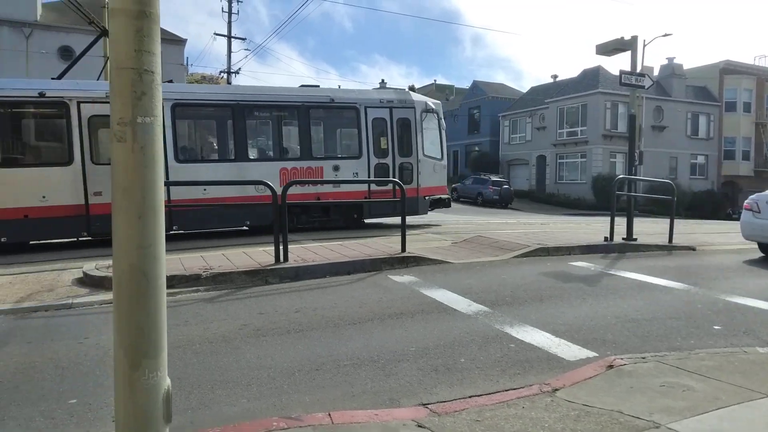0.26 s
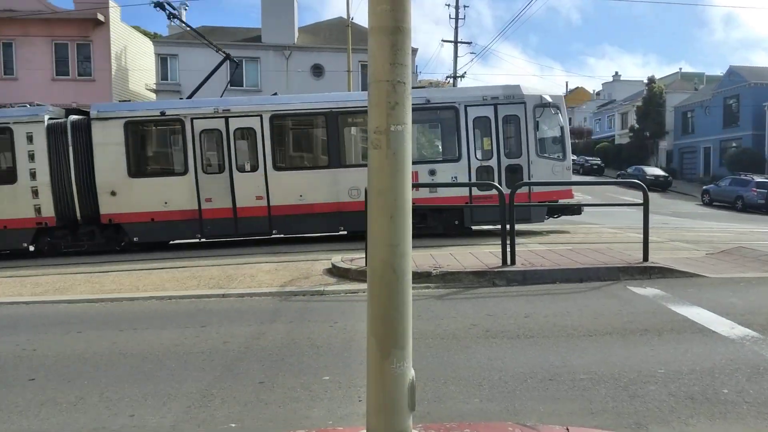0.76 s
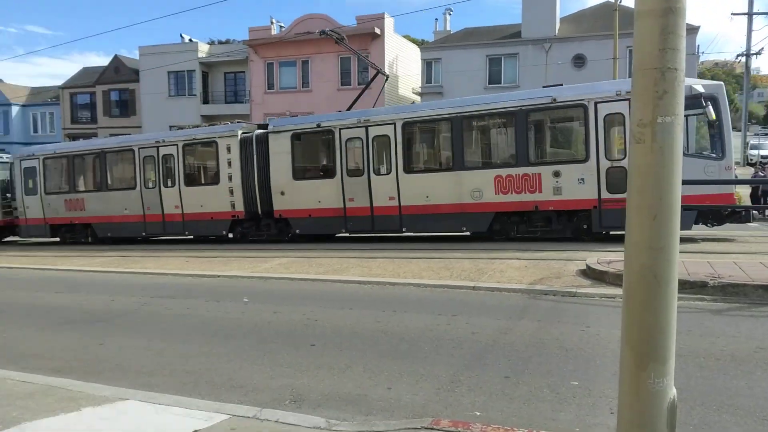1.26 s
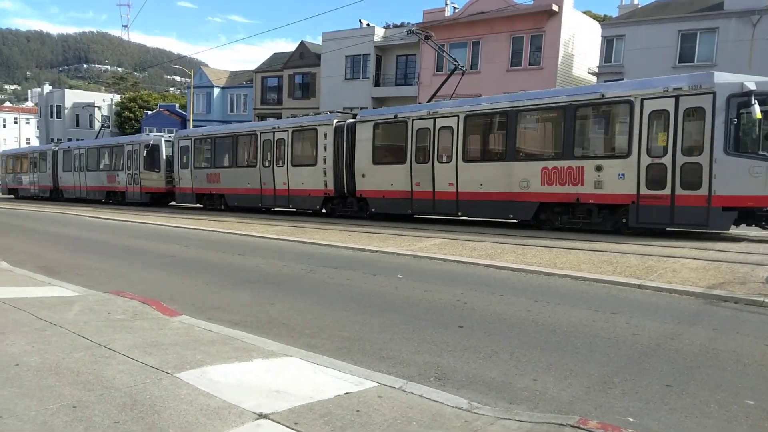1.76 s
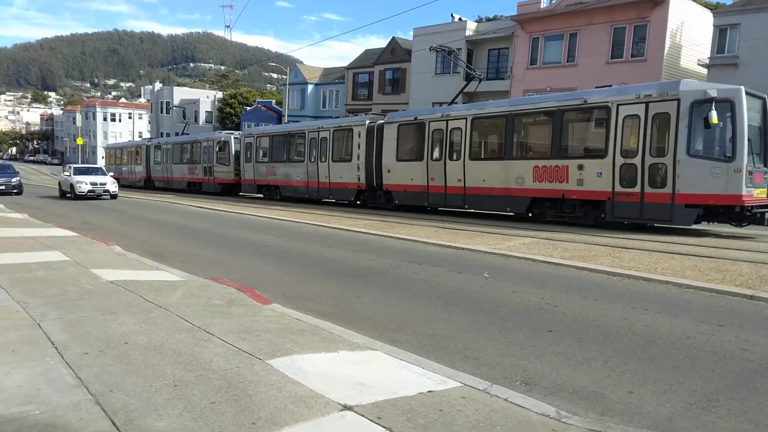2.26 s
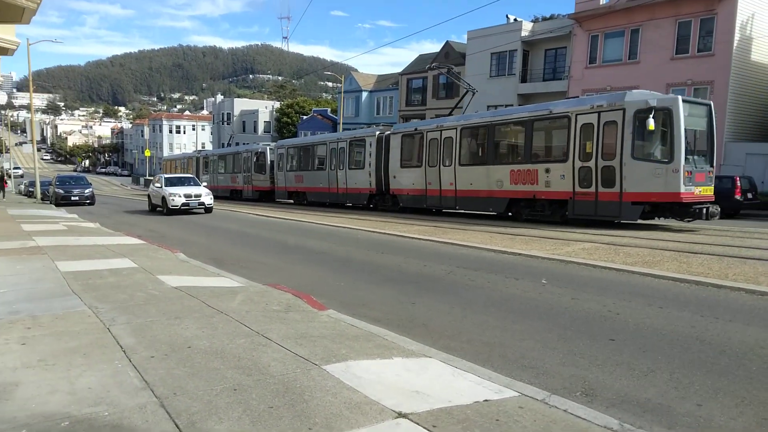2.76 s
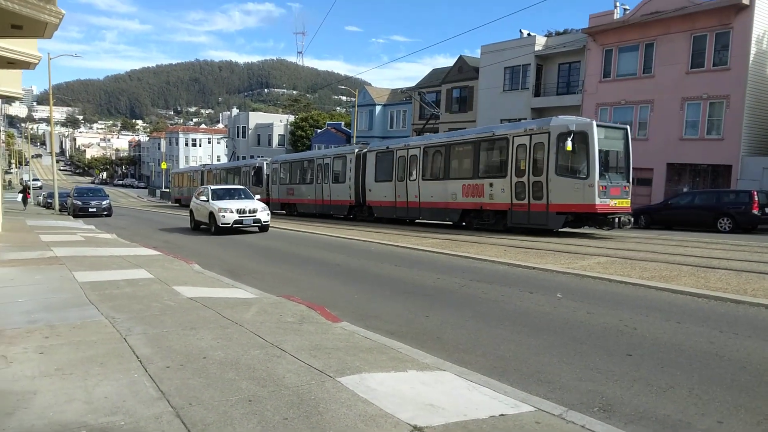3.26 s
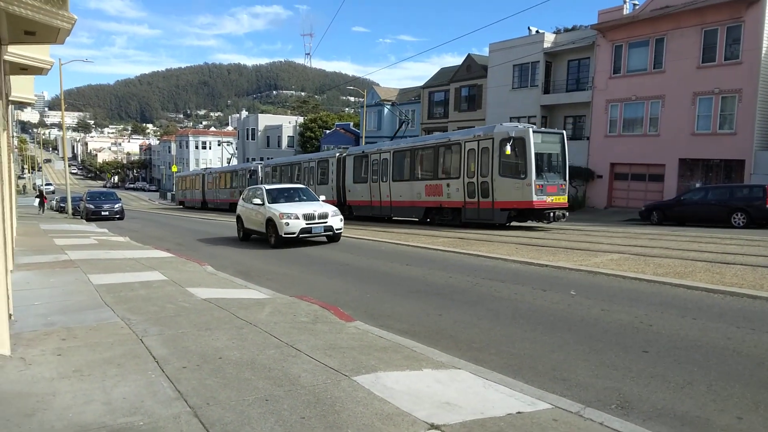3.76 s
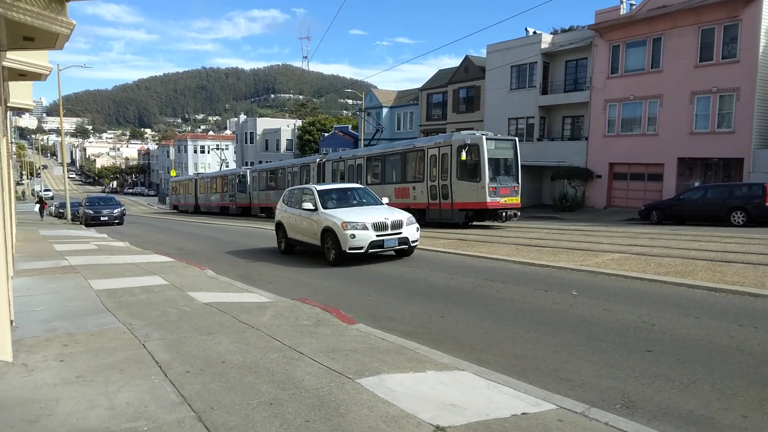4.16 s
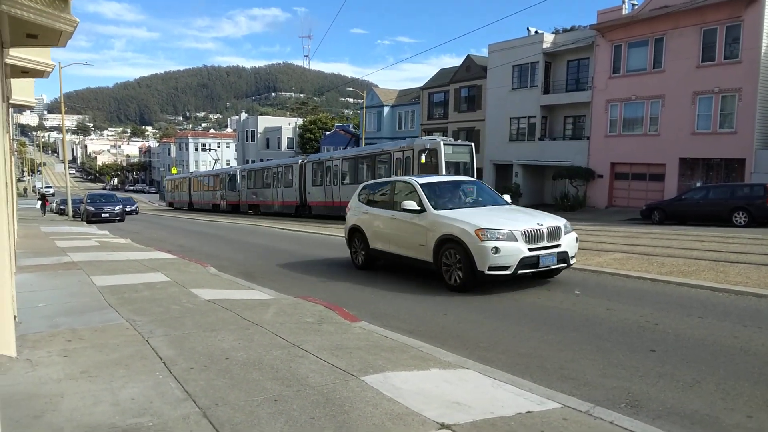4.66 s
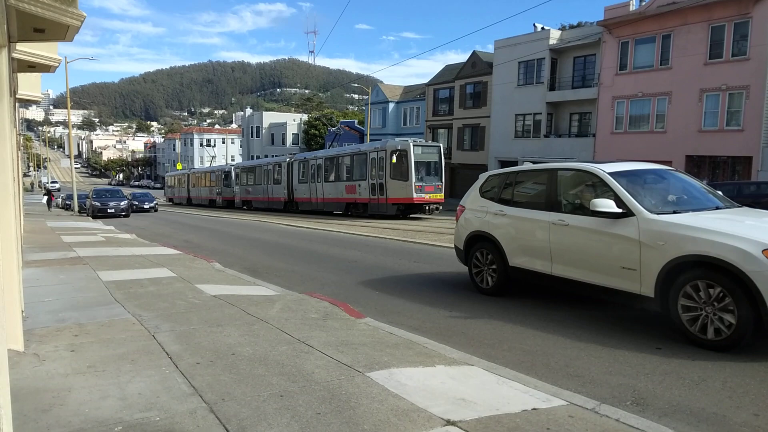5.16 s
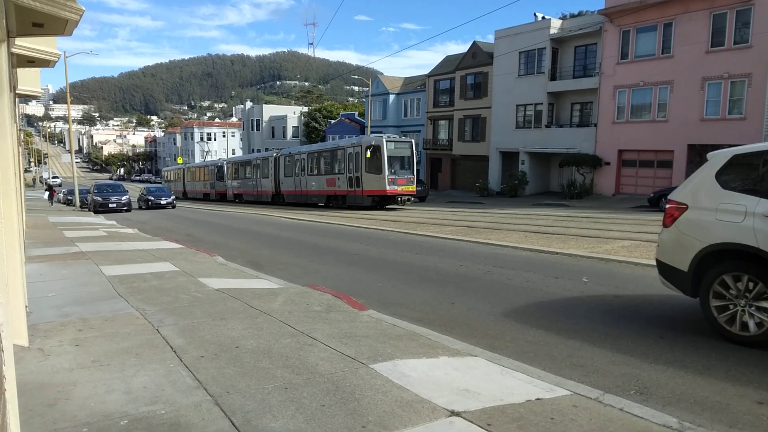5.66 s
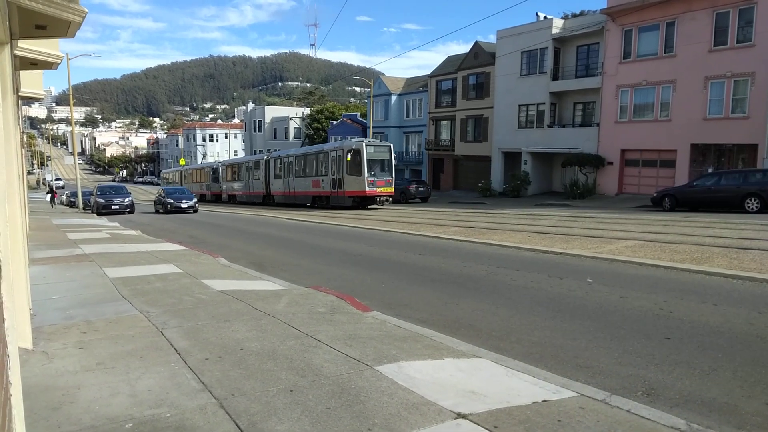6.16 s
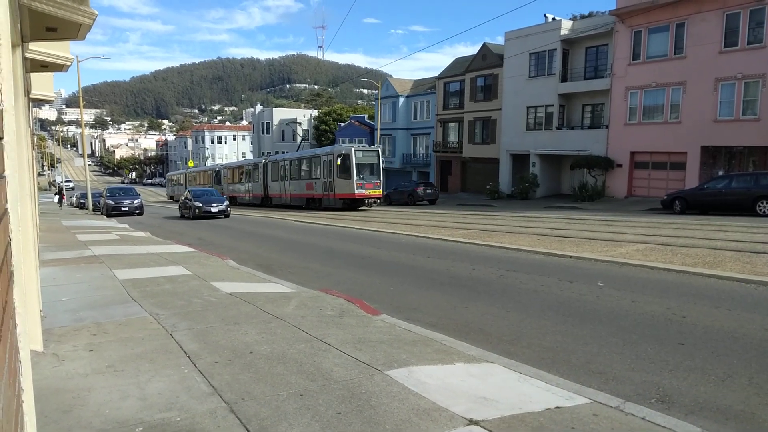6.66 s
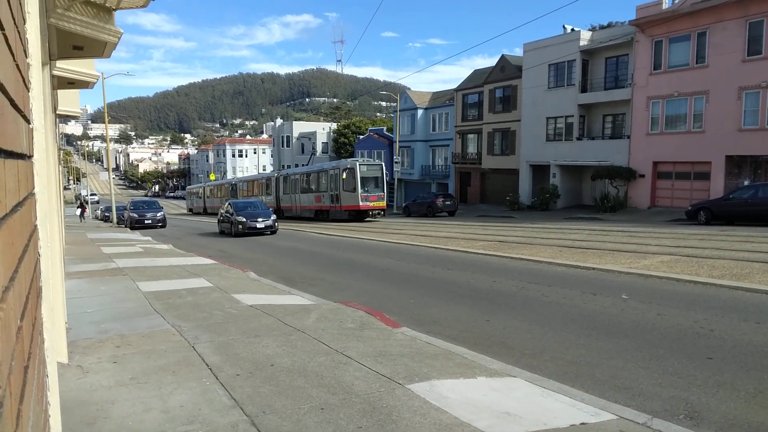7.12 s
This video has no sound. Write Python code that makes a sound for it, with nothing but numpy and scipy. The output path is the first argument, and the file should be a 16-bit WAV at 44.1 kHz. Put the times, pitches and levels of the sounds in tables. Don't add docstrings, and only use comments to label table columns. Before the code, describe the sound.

Close electric tram rolls by with a high steady motor whine, joint knocks and one steel clank, fading under increasingly violent wind buffeting.

```python
import sys
import numpy as np
from scipy import signal
from scipy.fft import rfft, irfft, next_fast_len
from scipy.io import wavfile
from scipy.ndimage import uniform_filter1d, map_coordinates

SR = 44100
rng = np.random.default_rng(int(sys.argv[2]) if len(sys.argv) > 2 else 0)


def invert_db(x):
    u = np.asarray(x, float) / 20
    return 10 ** u


def unload_audio(sound):
    columns = np.transpose(np.atleast_2d(sound))
    steps = np.round(np.clip(columns, -1, 1) * 32767)
    wavfile.write(sys.argv[1], SR, steps.astype(np.int16))


N = 325896

# time in seconds, level in dB.
TRAM_DISTANCE = [
    (0, -0.5),
    (.6, 0.5),
    (1.4, 0),
    (2.2, -1),
    (3, -3.5),
    (4, -5.5),
    (5, -7.5),
    (6, -7),
    (7.39, -8.5),
]
POWER_OFF_S, POWER_FADE_S = 6.8, 0.14


def unit(x):
    return x / np.sqrt(np.mean(x ** 2) + 1e-20)


def along(points, hz):
    f, v = np.transpose(points)
    return np.interp(np.log(hz + 1), np.log(f + 1), v)


def curves(rows):
    s, *cols = np.transpose(rows)
    return [np.interp(np.arange(N) / SR, s, c) for c in cols]


def ramp(at_s, over_s):
    return np.clip((np.arange(N) / SR - at_s) / max(over_s, .01), 0, 1)


def wobble(rate):
    knots = rng.standard_normal(int(N * 60 / SR) + 4)
    return map_coordinates(knots, [np.arange(N) * min(rate, 60) / SR], order=3)


def filtered(x, response):
    m = next_fast_len(N + 8192)
    return irfft(rfft(x, m) * response(np.fft.rfftfreq(m, 1 / SR)), m)[..., :N]


def patchy(x, depth_db, size):
    z = signal.stft(x, nperseg=512)[2]
    field = rng.standard_normal(z.shape)
    field = uniform_filter1d(uniform_filter1d(field, size[0], -2), size[1], -1)
    return signal.istft(z * invert_db(depth_db * unit(field)), nperseg=512)[1][..., :N]


def rush(spectrum, patchy_db, size=(6, 14)):
    # frequency in Hz, left-right likeness from -1 to 1.
    likeness = [(60, 1), (170, 1), (510, 0.78), (1470, -0.068), (4250, 0.12), (12300, -0.37)]
    pair = patchy(rng.standard_normal((2, N)), patchy_db, size)

    def spread(hz):
        angle = np.arccos(np.clip(along(likeness, hz), -1, 1)) / 2
        return invert_db(along(spectrum, hz)) * [np.cos(angle), np.sin(angle)]

    mid, side = filtered(pair, spread)
    return unit(np.array([mid + side, mid - side]))


def dulled(x, loss_db):
    corners_hz = np.array([[[5500]], [[9300]]])
    low, below = filtered(x[None], lambda hz: 1 / (1 + (hz / corners_hz) ** 6))
    return low + invert_db(0.28 * loss_db) * (below - low) + invert_db(loss_db) * (x - below)


def narrow(hz, width_hz, size):
    f = np.fft.rfftfreq(size, 1 / SR)
    noise = rfft(rng.standard_normal((2, size)))
    return unit(irfft(noise / (1 + ((f - hz) / width_hz) ** 2), size))


def car():
    # time in seconds, level in dB, left-right balance in dB.
    passing = [
        (0, -54, -2),
        (4.2, -56, -23),
        (5, -48.5, -11),
        (5.8, -40.5, 1),
        (6.3, -42.5, -2),
        (7.39, -42.5, -3),
    ]
    # frequency in Hz, density in dB per Hz.
    tyre_spectrum = [(900, -45), (1500, -2), (2400, 7), (3200, 1), (6000, -41), (9000, -59.5)]
    db, pan_db = curves(passing)
    return invert_db([db + pan_db / 2, db - pan_db / 2]) * rush(tyre_spectrum, patchy_db=1.6)


def gusting(breeze_db, gusts):
    t = np.arange(N) / SR
    peaks = [breeze_db]
    for s, db, length in gusts:
        slope_s = max(length, .005) * np.where(t < s, 0.77, 1.035)
        peaks.append(db - 10 * np.abs(t - s) / slope_s)
    return np.max(peaks, axis=0)


def wind(db, slaps, shelter):
    # frequency in Hz, density in dB per Hz.
    buffet_spectrum = [(10, -27), (30, 3), (80, 4.5), (150, -3), (300, -16.5), (600, -43), (1200, -70),
                       (3000, -84)]
    # frequency in Hz, density in dB per Hz.
    slap_spectrum = [(40, -36), (120, -3), (250, 4), (500, -1), (900, -14), (1600, -28.5), (3000, -41.5),
                     (6000, -99)]

    def colours(hz):
        bright = along(slap_spectrum, hz * shelter) + 3 * np.log2(1 + hz / 1000)
        return invert_db([along(buffet_spectrum, hz), along(buffet_spectrum, hz / 1.5), bright])

    slow, fast, slap = filtered(rng.standard_normal((3, N)), colours)
    speed = np.clip((db + 19.5) / 18, 0, 1)
    buffet = np.sqrt(1 - speed) * unit(slow) + np.sqrt(speed) * unit(fast)
    out = invert_db(db - 4.0) * unit(invert_db(2.8 * wobble(22)) * buffet)
    flutter = unit(invert_db(-0.5 * wobble(45)) * np.roll(slap, N // 2))
    out += invert_db(-17.5 + 1.33 * db) * flutter
    span = np.arange(-2000, 2000)
    t = span / SR
    for s, level_db, length in slaps:
        at = np.clip(round(s * SR) + span, 0, N - 1)
        gate = np.exp(-(t / max(length, .002) / np.where(t < 0, .7, 1.2)) ** 2)
        burst = gate * slap[at]
        out[at] += invert_db(level_db) * burst * np.linalg.norm(gate) / np.linalg.norm(burst)
    return out


def snaps():
    # time in seconds, level in dB.
    jumps = [(4.6638, -7), (4.6698, -15), (4.7563, -13), (4.7856, -14), (4.8308, -17), (4.865, -19),
             (4.8764, -31), (4.8844, -15), (5.6233, -17), (5.7424, -26), (5.8057, -21), (5.922, -27),
             (6.0576, -22), (6.0968, -13), (6.1294, -18), (6.1806, -14), (6.2371, -26), (6.243, -17),
             (6.2524, -13), (6.2975, -5), (6.305, -9), (6.373, -8), (6.4281, -16), (6.4696, -10.5),
             (6.522, -7), (6.5356, -12), (6.597, -22), (6.605, -25), (6.6373, -22), (6.6455, -20.5),
             (6.6697, -24), (6.677, -18), (6.6862, -15.5), (6.7076, -10), (6.7616, 1), (6.8068, -4.5),
             (6.832, -4), (6.8397, -12), (6.8697, -21), (6.8979, -22), (6.921, -22), (7.0833, -16),
             (7.0886, -5.5), (7.0968, -10), (7.2328, -17), (7.2415, -26), (7.3696, -25)]
    low_hz, top_hz = 350, 1050
    s, db = np.transpose(jumps)
    pushes = np.zeros(N)
    pushes[np.round(s * SR).astype(int)] = invert_db(db + 42.5) * np.sign(rng.standard_normal(len(s)))

    def push_shape(hz):
        low = 1j * hz / low_hz
        return low / (1 + low) ** 2 / (1 + (hz / top_hz) ** 2) ** 1.26

    return filtered(pushes, push_shape)


def port_winds():
    # time in seconds, left level in dB, right level in dB.
    breeze = [
        (0, -14.5, -55),
        (4.2, -45, -38),
        (5, -13, -12),
        (6.2, -28.5, -12),
        (7.39, -20, -19),
    ]
    # peak time in seconds, peak
    # in dB, seconds to lose 10 dB.
    left_gusts = [(.03, -18, 0.5), (0.292, -11.5, -0.2), (1.12, -6, -0.5), (1.518, -8, -0.04),
                  (1.879, -1, -0.93), (2.17, -18, 0.95), (2.51, -12, -0.14), (3.45, -21, 1.6),
                  (4.44, -8, -0.76), (4.68, -9, 0.26), (4.901, -9.5, 0.23), (5.05, -20, 1.9),
                  (5.24, -14, 0.4), (5.4, -12, -2), (5.521, -5, -0.39), (6.019, -8, -0.34),
                  (6.209, -1.5, -0.02), (6.45, -1, 0.13), (6.53, -8.5, 0.37), (6.66, 0, 0),
                  (6.82, -13, 0.5), (7.05, -6, 0.1), (7.16, -16, -2), (7.36, -16.5, 3)]
    right_gusts = [(.43, -6, 0.12), (1.459, -3.5, 0.052), (2.25, -18, 0.18), (2.95, -12, 0.044),
                   (3.11, -11, 0.031), (3.23, -8, 0.028), (3.36, -4.5, 0.025), (3.56, -11.5, .08),
                   (3.98, -9.5, .07), (4.131, -6, .03), (4.373, -6, .05), (4.517, -3, 0.026),
                   (4.61, -5, .03), (4.669, 1.5, 0.017), (4.763, 4.5, .014), (4.804, 2.5, 0.059),
                   (4.865, 1.5, 0.028), (5.34, -6, 0.098), (5.74, -7.5, .06), (5.93, -1.5, 0.029),
                   (6.072, -3, 0.3), (6.33, 4.5, 0.077), (6.47, 1, 0.19), (6.71, -3, 0.066),
                   (6.821, 6, 0.079), (7.091, -2.5, 0.064), (7.199, 0.5, 0.077), (7.339, -2.5, 0.089)]
    # time in seconds, level in dB, length in seconds.
    left_slaps = [(0.281, -17.5, 0.062), (1.521, -11, 0.008), (2.084, -30, 0.012), (4.733, -32, 0.0053),
                  (6.4, -23, 0.009), (6.439, -26, 0.013), (6.525, -22, 0.0088), (6.553, -13, 0.0035),
                  (6.634, -12.5, 0.0048), (6.653, -28, 0.011), (7.052, -23, 0.015), (7.106, -23, 0.0025),
                  (7.149, -12.5, 0.0083)]
    right_slaps = [(1.46, -16.5, 0.016), (2.241, -13, 0.0064), (4.67, -15.5, 0.0068), (4.757, -17, 0.0031),
                   (4.797, -16, 0.035), (4.869, -8.5, 0.021), (5.203, -16.5, 0.0106), (5.742, -5.5, 0.003),
                   (5.806, -9.5, 0.0045), (5.923, -18, 0.0076), (6.057, -8, 0.0069), (6.092, -10, 0.011),
                   (6.241, -3, 0.011), (6.297, -2, 0.003), (6.344, -11.5, 0.028), (6.366, -3.5, 0.024),
                   (6.416, -0.5, 0.0023), (6.467, -4, 0.0064), (6.523, -6, 0.0084), (6.601, -6.5, 0.004),
                   (6.676, -6.5, 0.01), (6.705, -7.5, 0.0018), (6.739, -3.5, 0.0045), (6.758, -2, 0.014),
                   (6.78, 4, 0.0037), (6.81, -7.5, 0.016), (6.833, -6, 0.014), (7.086, -4, 0.0099),
                   (7.181, -15.5, 0.016), (7.234, -8.5, 0.0091)]
    left_db, right_db = curves(breeze)
    left = wind(gusting(left_db, left_gusts), left_slaps, shelter=0.94)
    right = wind(gusting(right_db, right_gusts), right_slaps, shelter=1.13)
    return np.array([left, right + snaps()])


def clank():
    # frequency in Hz, density in dB per Hz.
    steel_spectrum = [(400, -25), (800, 0), (1800, 0), (3200, -12), (5000, -35), (7000, -120)]
    strike_s, t60_s = 1.101, 0.06
    u = np.arange(N) / SR - strike_s
    decay = invert_db(-15 - 60 * np.abs(u) / t60_s)
    return decay * ramp(strike_s, .01) ** .5 * rush(steel_spectrum, patchy_db=0)


def joints():
    # time in seconds, peak in dB, length in seconds, left-right balance in dB, treble tilt in dB.
    axles = [(.005, -24.5, 0.026, -1.5, -14), (0.814, -19, 0.034, -2, -13), (0.924, -29.5, .03, -8.5, -9.5),
             (1.48, -44, .03, 4, -15), (2.086, -23.5, 0.021, 7.5, -1.5), (2.41, -31.5, 0.023, 7.5, -5),
             (2.52, -28, 0.028, 6.5, -7), (2.794, -33, 0.026, 5.5, -1), (2.89, -29.5, 0.027, 4.5, -23),
             (2.938, -28, 0.015, -3, -19), (3.275, -28.5, 0.053, 3.5, -8), (4.769, -24.5, 0.05, 0, -20),
             (6.057, -28, 0.022, 2, -21)]
    # frequency in Hz, density in dB per Hz.
    clack_spectrum = [(600, -14), (1500, 4), (3500, 7), (5500, -4.5), (7500, -2.5), (10000, -13.5),
                      (13000, -36.5), (16000, -46)]
    t = np.arange(N) / SR
    size, tilt_db = np.zeros((2, N)), np.zeros(N)
    for s, db, length, pan_db, bright_db in axles:
        u = np.clip(t - s, 0, 1) / max(length, .004)
        shape = (1 - np.exp(-u * 6)) * (np.exp(-u ** 2) + 0.66 * np.exp(-u / 5.2))
        size += invert_db(db - 10.0 + np.array([[pan_db / 2], [-pan_db / 2]])) * shape
        tilt_db[t >= s] = bright_db
    return size * dulled(rush(clack_spectrum, patchy_db=1.5, size=(3, 16)), tilt_db)


def wheels():
    # time in seconds, level in dB.
    low_note = [
        (0, -50),
        (1, -51),
        (2.1, -36),
        (3.2, -39.5),
        (4.2, -41),
        (4.7, -58),
        (7.39, -66),
    ]
    # time in seconds, pitch in Hz, level in dB, T60 in seconds.
    struck = [(.825, 2150, -32, .15), (.825, 4800, -38, 0.23), (.825, 5180, -44, .12),
              (.825, 7570, -46, .15), (.935, 3470, -38, .15), (2.09, 1790, -37, .1), (2.09, 3850, -40, .15),
              (2.09, 4210, -40, .15), (2.09, 7970, -45, .12), (2.525, 3690, -41, .15),
              (2.525, 5700, -48, .12), (2.525, 6550, -50, .12), (2.09, 7650, -47, .12),
              (2.935, 3404, -39.5, 0.11), (4.78, 3600, -37, .25), (4.78, 6170, -51, .2)]
    out = invert_db(curves(low_note)[0]) * narrow(970, 45, size=N)
    t = np.arange(SR // 4) / SR
    swell = 1 - np.exp(-(t / 0.0061) ** 2)
    for s, hz, db, t60 in struck:
        note = invert_db(db - 60 * t / t60) * swell * narrow(hz, 50, size=len(t))
        out[:, round(s * SR):][:, :len(t)] += note
    return out


def song():
    # time in seconds, pitch in Hz, level in dB.
    sung = [(0, 1086, -26.5), (.3, 1078, -29.5), (.6, 1089, -31.5), (1, 1098, -27.5), (1.4, 1085, -29.5),
            (2, 1083, -30.5), (2.6, 1090, -28), (3.2, 1080, -32.5), (5.1, 1090, -36), (5.6, 1090, -35.5),
            (6.3, 1097, -34.5), (6.7, 1098, -37), (7.05, 1092, -33), (7.2, 1103, -43.5),
            (7.39, 1097, -40.5)]
    # pitch ratio, half width in Hz, level in dB.
    resonances = [
        (1, 36, -1),
        (1.045, 54, -6),
    ]
    # time in seconds, level in dB, phase wander in radians.
    steady = [
        (0, -6.5, 3.5),
        (2, -8, 3.4),
        (4.5, -17, 3.3),
        (5.5, -4, 2.06),
        (7.39, 1.5, 2.1),
    ]
    hz, db = curves(sung)
    turn = 2 * np.pi * np.cumsum(hz) / SR
    out = np.zeros((2, N))
    for ratio, width, level_db in resonances:
        keep = np.exp(-2 * np.pi * width / SR)
        rough = rng.standard_normal((2, N)) + 1j * rng.standard_normal((2, N))
        swing = signal.lfilter([1], np.convolve([1, -keep], [1, -keep]), rough)
        out += invert_db(level_db) * unit((swing * np.exp(1j * ratio * turn)).real)
    core_db, wander = curves(steady)
    core = np.sin(turn + wander * np.array([wobble(9), wobble(9.2)]))
    near, far = out + invert_db(core_db) * unit(core)
    apart = 0.57
    return invert_db(db) * unit(np.array([near + apart * far, near - apart * far]))


def chopper(path, db):
    # centre in Hz, width in Hz, level in dB.
    housing = [(3430, 300, -54), (3955, 150, -53), (4150, 150, -55), (4420, 500, -54.5), (4760, 120, -51.5),
               (4945, 120, -56), (5850, 450, -70), (6870, 300, -59), (7600, 380, -58), (8350, 500, -66),
               (9100, 700, -81), (10550, 600, -77), (11320, 300, -74), (12620, 500, -70),
               (14200, 2200, -84)]
    hz, = curves(path)
    tone_hz = hz.mean() * np.arange(4097)
    peaks = [invert_db(level_db) / (1 + (2 * (tone_hz - c) / w) ** 2) for c, w, level_db in housing]
    ring = np.max(peaks, axis=0) * (tone_hz < 15700) * (tone_hz > 2900)
    phase = rng.random(4097) + [[0], [.25]]
    cycle = irfft(ring * np.exp(2j * np.pi * phase))
    place = np.cumsum(hz) / SR % 1 * 8192
    whine = np.array([np.interp(place, np.arange(8193), np.append(c, c[0])) for c in cycle])
    powered = 1 - ramp(POWER_OFF_S, POWER_FADE_S)
    level = invert_db(db + 1.05 * curves(TRAM_DISTANCE)[0])
    return powered * level * unit(patchy(whine, depth_db=3.5, size=(2, 40)))


def motor_whine():
    # time in seconds, pitch in Hz.
    direct = [(0, 199.15), (.7, 198.35), (1.5, 197.85), (2.3, 197.58), (3.2, 197.46), (4.6, 197.57),
              (6, 197.9), (6.9, 198.2)]
    # time in seconds, pitch in Hz.
    mirrored = [(0, 199.9), (1.8, 199.05), (2.8, 198.4), (3.3, 198.32), (4, 198.27), (5, 198.27),
                (6, 198.42), (6.9, 198.6)]
    facing_s, turn_s, shaded_db = 3.1, .25, -11
    echo_db = -45 + shaded_db * (1 - ramp(facing_s - turn_s, 2 * turn_s))
    treble_db = 3 - 3 * np.arange(N) / SR
    return dulled(chopper(direct, -43.5) + chopper(mirrored, echo_db), treble_db)


def rolling():
    # frequency in Hz, density in dB per Hz.
    rumble_spectrum = [(12, -33), (20, -1), (49, -4), (80, 1.5), (189, -0.5), (315, -4.5), (549, -31),
                       (634, -13.5), (900, -22.5), (1170, -72), (1980, -120)]
    body_spectrum = [(250, -3.5), (450, -1), (640, -4.5), (850, -14.5), (1000, -0.5), (1300, -10),
                     (1750, -5.5), (2200, -16), (3000, -61)]
    hiss_spectrum = [(1200, -37), (2000, -5), (3000, -6.5), (3450, 2.5), (4000, -9), (5600, -17.5),
                     (6400, -20), (7600, -19.5), (8500, -21.5), (9200, -30), (10600, -36.5), (11300, -47),
                     (11900, -51), (12600, -42), (13000, -44), (13400, -62), (13900, -53), (14500, -53),
                     (15000, -59), (16500, -65)]
    far_db, = curves(TRAM_DISTANCE)
    abreast_s, sweep_db_per_s, behind_db = 3.1, 2.5, 1.5
    pan_db = behind_db - sweep_db_per_s * abreast_s * (1 - ramp(0, abreast_s))
    loss_db = -0.5 + 0.092 * far_db - 12 * ramp(POWER_OFF_S, POWER_FADE_S)
    rumble = invert_db(-19.5 + 0.95 * far_db) * rush(rumble_spectrum, patchy_db=1.0)
    body = invert_db(-29.5 + far_db) * rush(body_spectrum, patchy_db=1.0)
    hiss_db = -34 + 1.024 * far_db + 0.73 * wobble(6.8) + 1.0 * wobble(2.39)
    hiss = invert_db(hiss_db) * rush(hiss_spectrum, patchy_db=1.0)
    return rumble + body + dulled(hiss, loss_db) * invert_db([pan_db / 2, -pan_db / 2])


def ticks(wave):
    # time in seconds, level in dB.
    hits = [(6.0968, -40), (6.2376, -44), (6.2464, -45), (6.2519, -33.5), (6.2984, -38), (6.3049, -34),
            (6.3299, -43), (6.3408, -37), (6.3595, -35), (6.3637, -37), (6.3813, -42), (6.4336, -47),
            (6.4693, -45), (6.4844, -45), (6.523, -36), (6.5249, -37), (6.53, -45.5), (6.535, -39),
            (6.5984, -39), (6.6758, -44.5), (6.6952, -44), (6.7382, -44), (6.7471, -42), (6.7549, -43),
            (6.7615, -38), (6.7668, -44), (6.7703, -39), (6.7783, -31), (6.7879, -40), (6.808, -29.5),
            (6.8131, -41), (6.8205, -42), (6.8279, -38), (6.835, -34.5), (6.839, -35), (6.869, -43),
            (7.0783, -47), (7.0833, -41), (7.089, -29), (7.1554, -43), (7.1912, -47), (7.2209, -46),
            (7.2246, -46.5), (7.2326, -38)]
    kicks = np.zeros(N)
    s, db = np.transpose(hits)
    at = np.round(s * SR).astype(int)
    kicks[at] = -invert_db(db + 22.5) * np.sign(wave[at])
    return filtered(kicks, lambda hz: (hz / 700) / (1 + (hz / 700) ** 2) * 9 / (1 + (hz / 11000) ** 2))


def scene():
    # frequency in Hz, left-right balance in dB.
    port_balance = [(60, -3.5), (600, 2), (1100, -3), (2100, 2), (3500, 1.5), (4500, 3), (6500, 5),
                    (7600, 10.5), (8600, 6.5), (10000, -23.5), (11000, -32), (13000, -13.5), (15000, 17)]
    street = rolling() + song() + motor_whine() + joints() + car() + clank() + wheels()
    street = filtered(street, lambda hz: invert_db([along(port_balance, hz) / 2, -along(port_balance, hz) / 2]))
    return street + port_winds()


def top_cut(x):
    return signal.sosfilt(signal.butter(12, 15800, fs=SR, output="sos"), x)


def record(dry):
    hard = 10
    clipped = dry / (1 + np.abs(dry / 0.99) ** hard) ** (1 / hard)
    clipped[1] += ticks(clipped[1])
    return top_cut(np.clip(clipped, -1, 1))


dry = scene()
out = record(dry)
unload_audio(out)
```